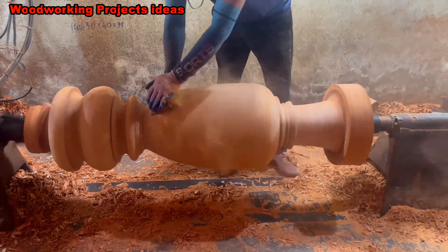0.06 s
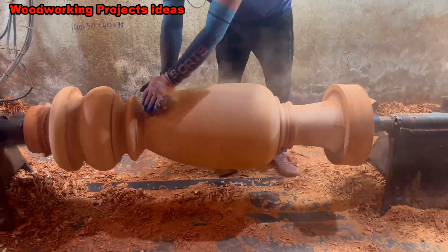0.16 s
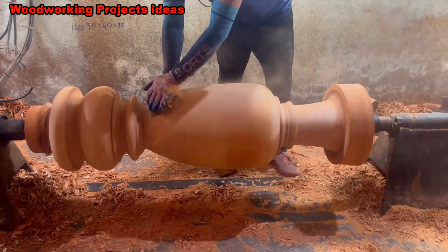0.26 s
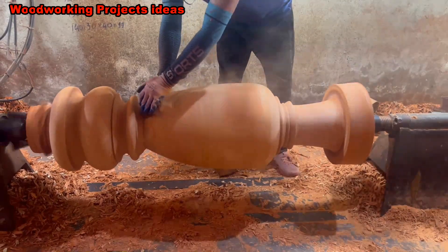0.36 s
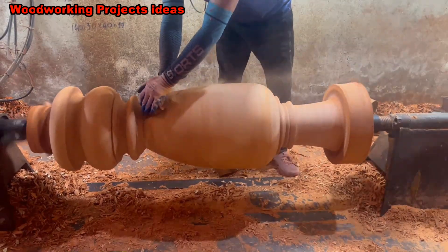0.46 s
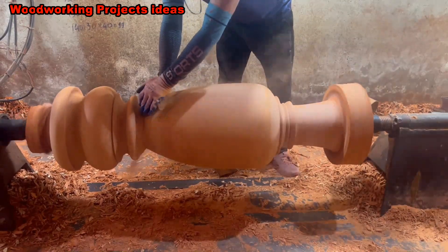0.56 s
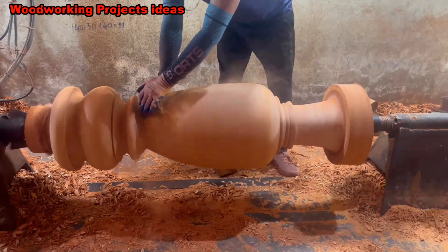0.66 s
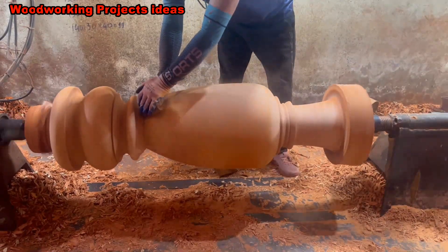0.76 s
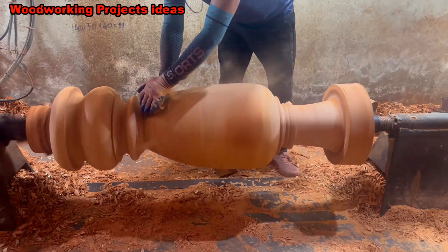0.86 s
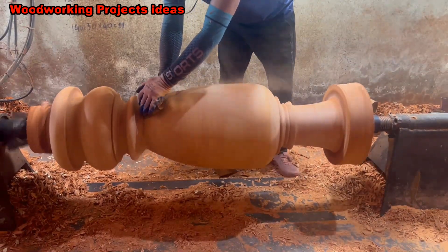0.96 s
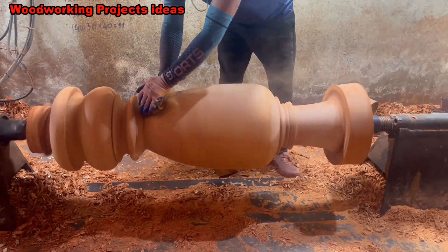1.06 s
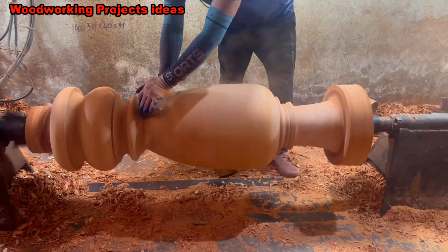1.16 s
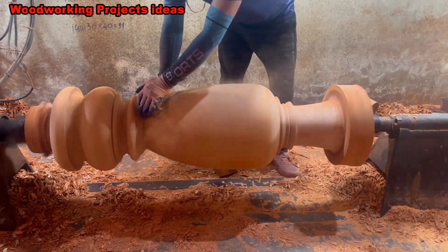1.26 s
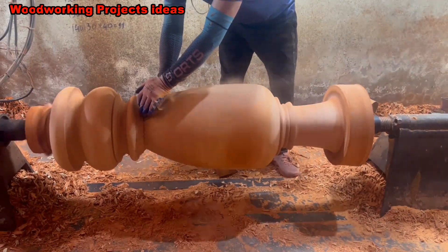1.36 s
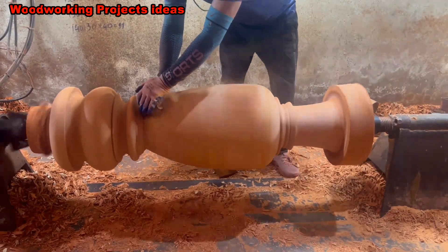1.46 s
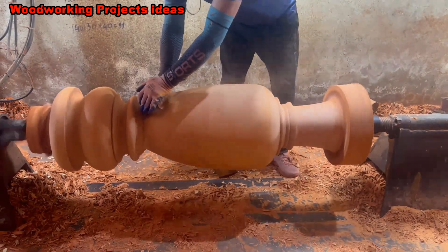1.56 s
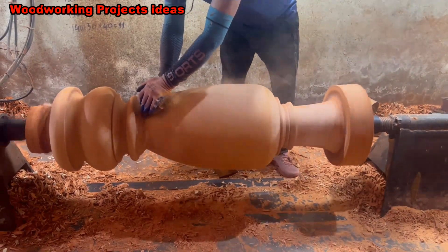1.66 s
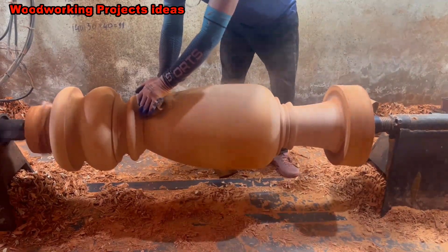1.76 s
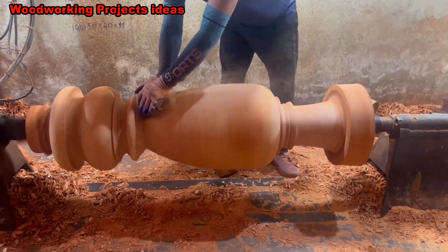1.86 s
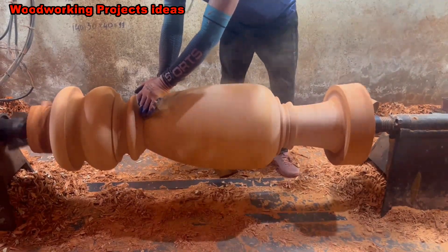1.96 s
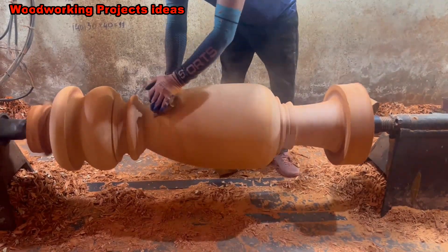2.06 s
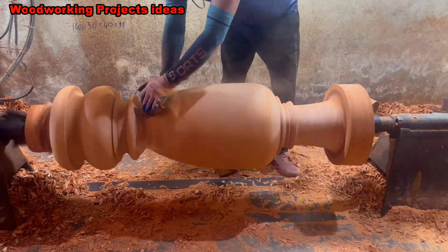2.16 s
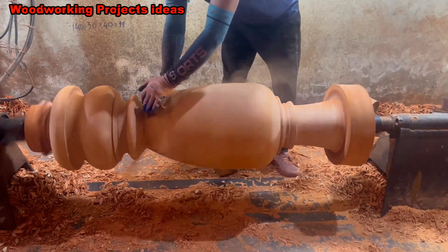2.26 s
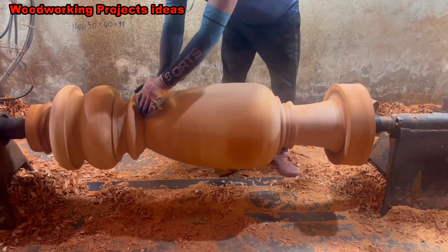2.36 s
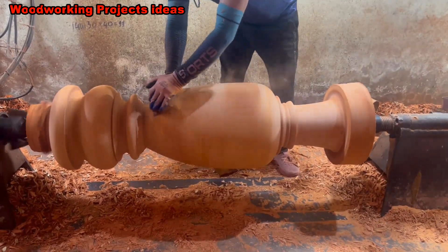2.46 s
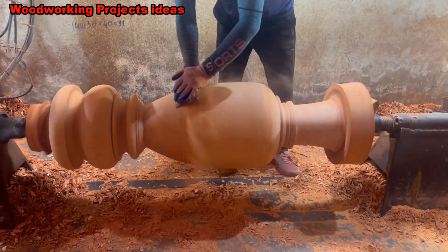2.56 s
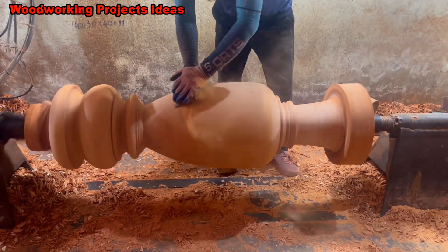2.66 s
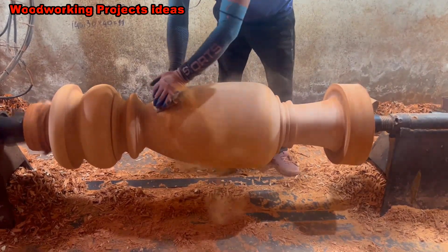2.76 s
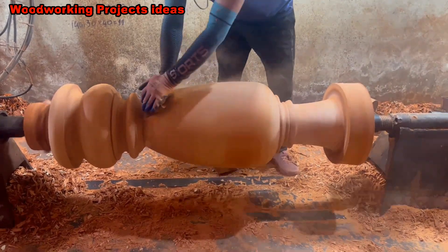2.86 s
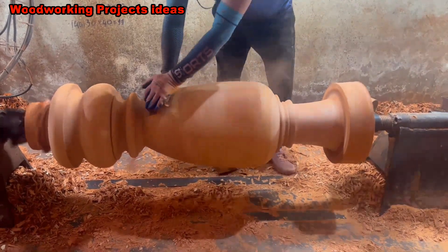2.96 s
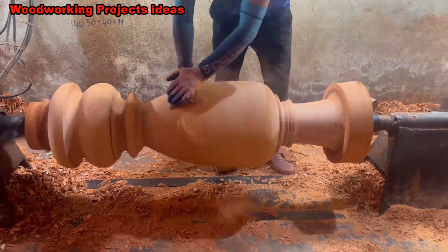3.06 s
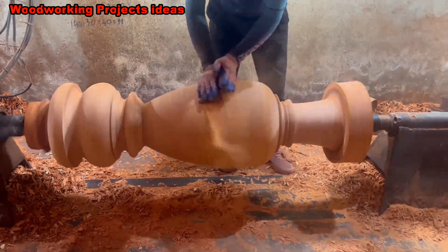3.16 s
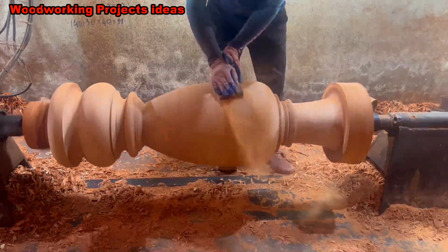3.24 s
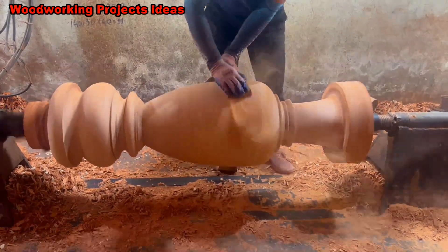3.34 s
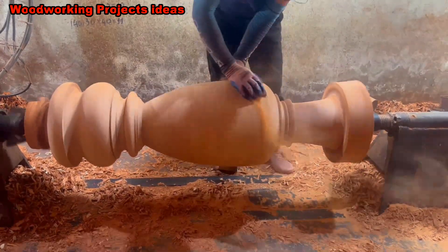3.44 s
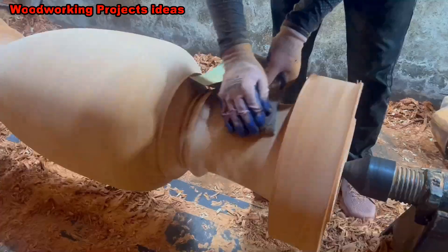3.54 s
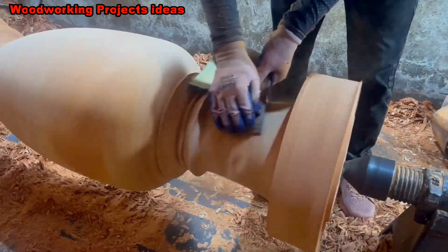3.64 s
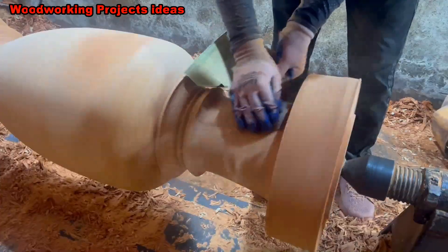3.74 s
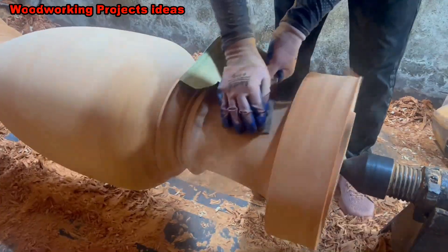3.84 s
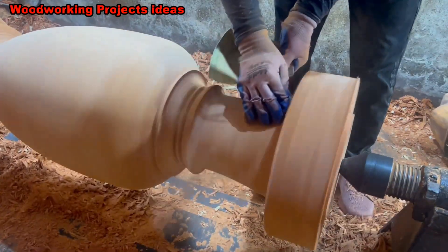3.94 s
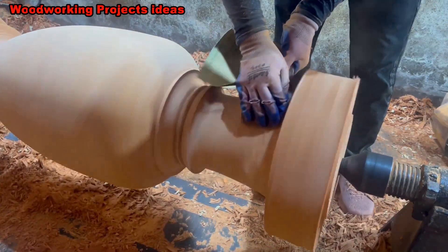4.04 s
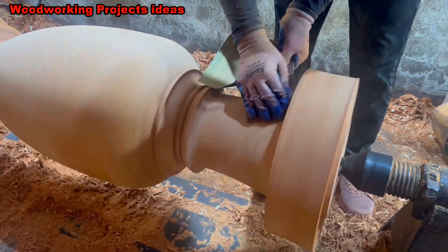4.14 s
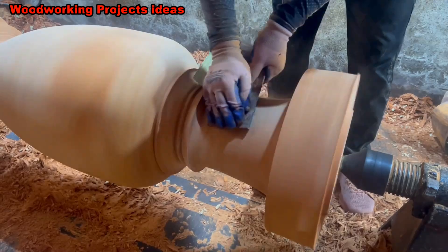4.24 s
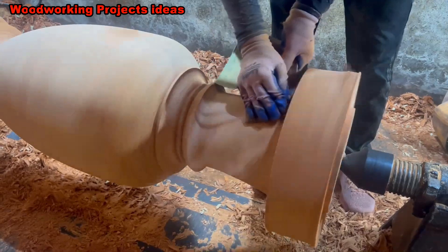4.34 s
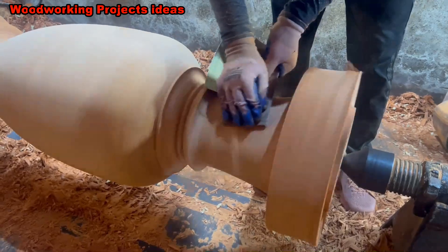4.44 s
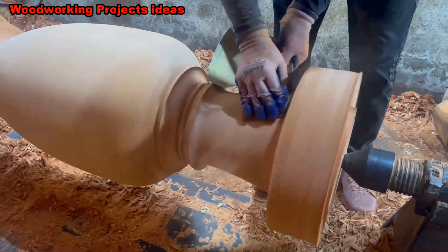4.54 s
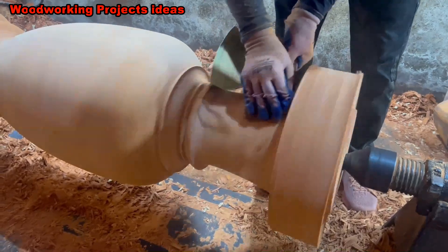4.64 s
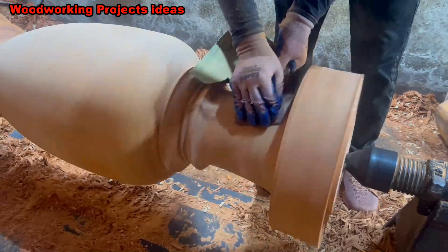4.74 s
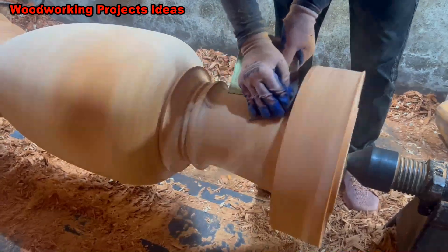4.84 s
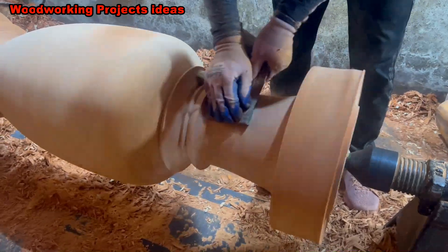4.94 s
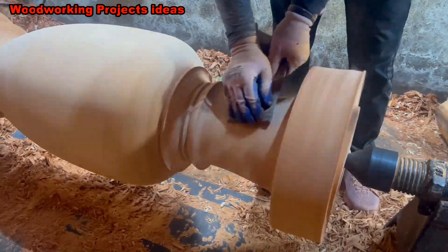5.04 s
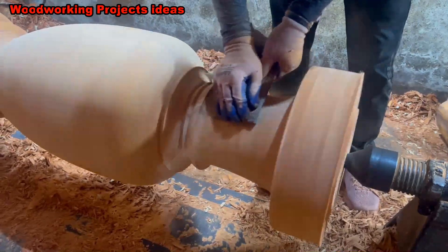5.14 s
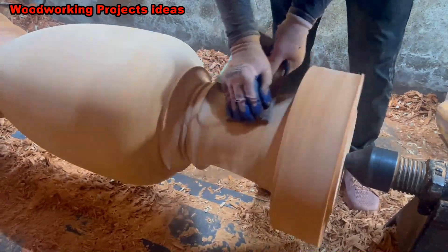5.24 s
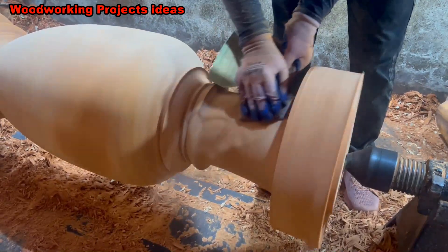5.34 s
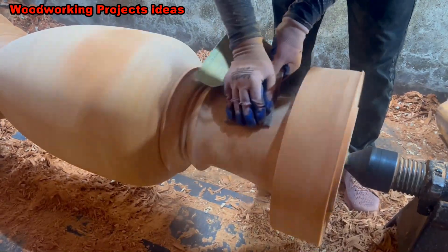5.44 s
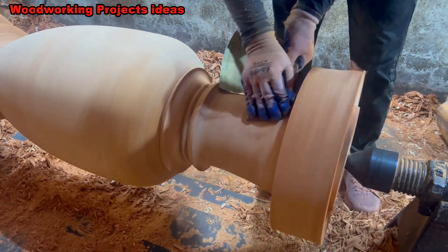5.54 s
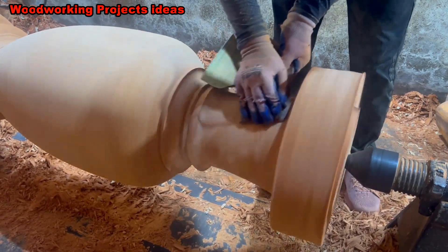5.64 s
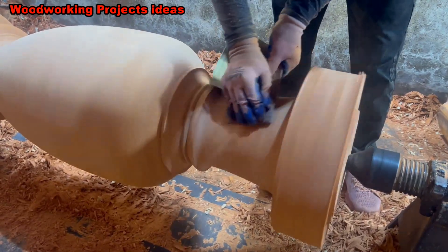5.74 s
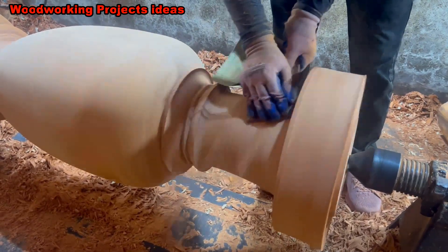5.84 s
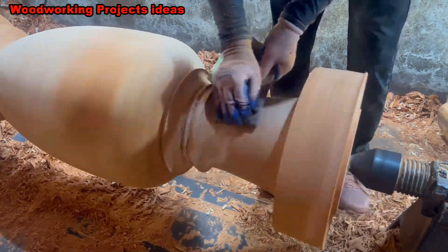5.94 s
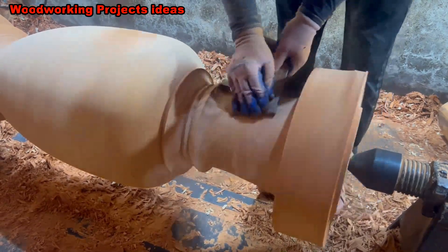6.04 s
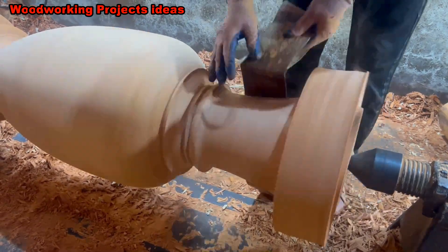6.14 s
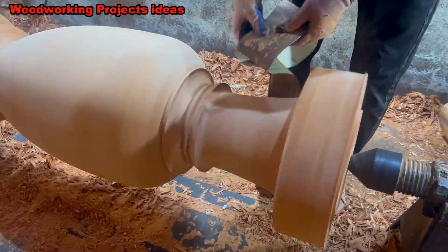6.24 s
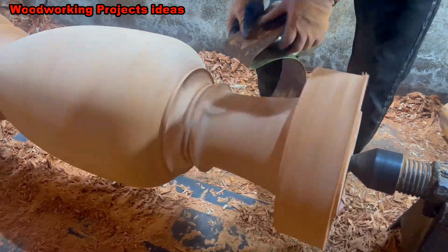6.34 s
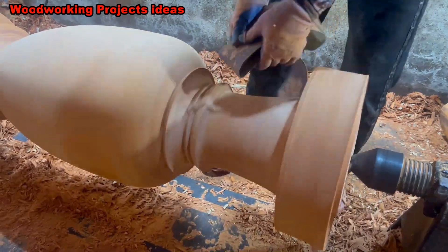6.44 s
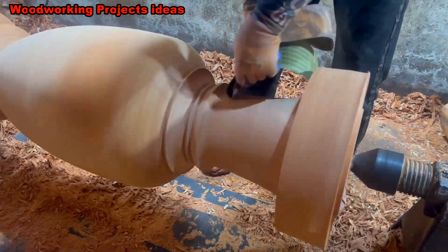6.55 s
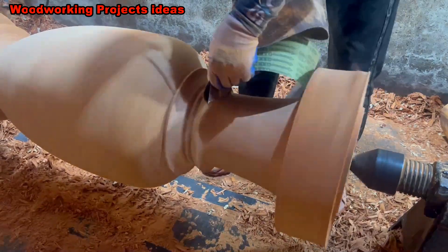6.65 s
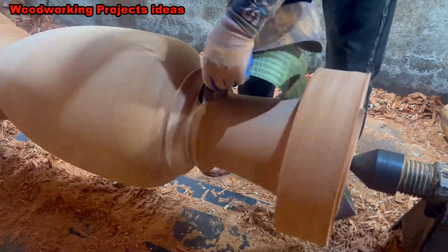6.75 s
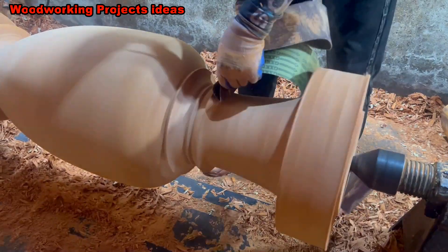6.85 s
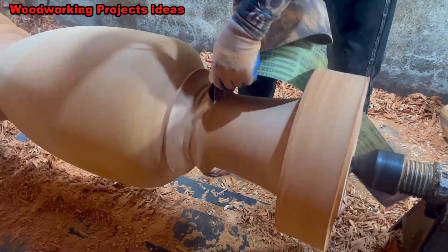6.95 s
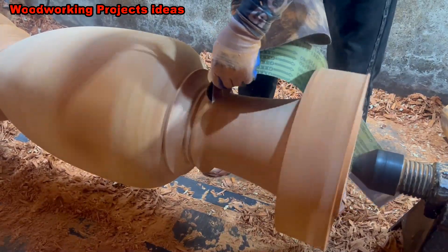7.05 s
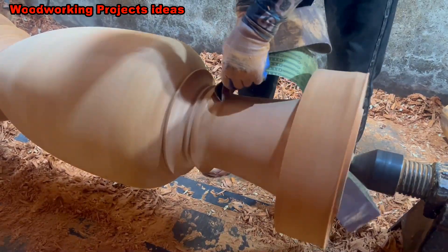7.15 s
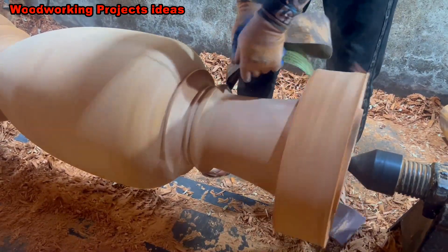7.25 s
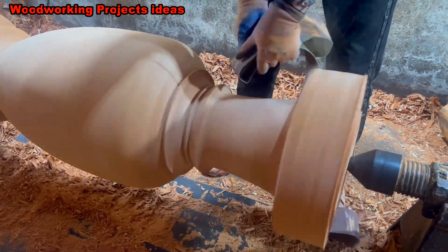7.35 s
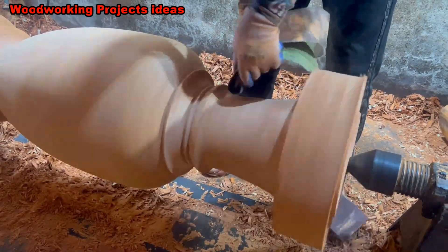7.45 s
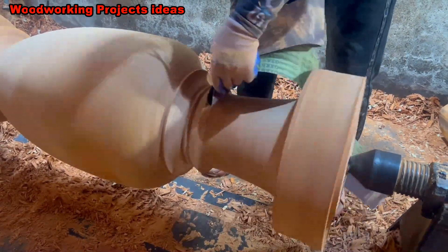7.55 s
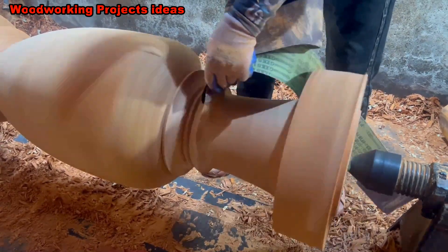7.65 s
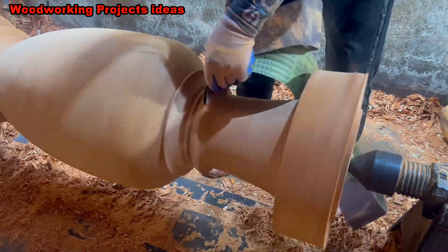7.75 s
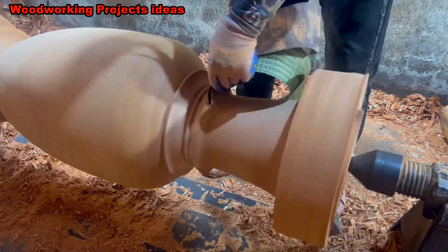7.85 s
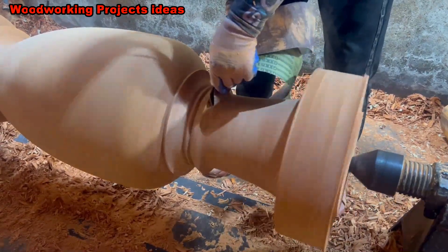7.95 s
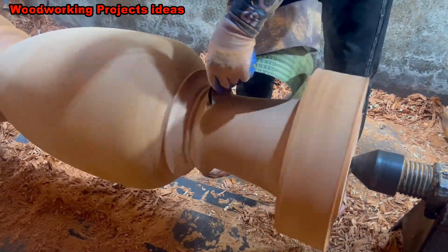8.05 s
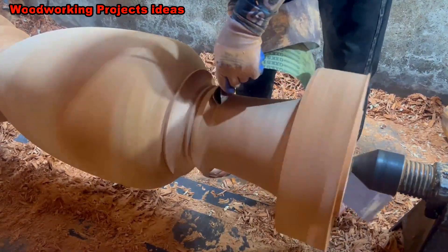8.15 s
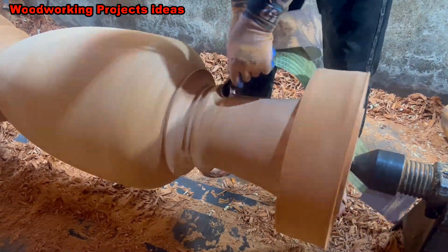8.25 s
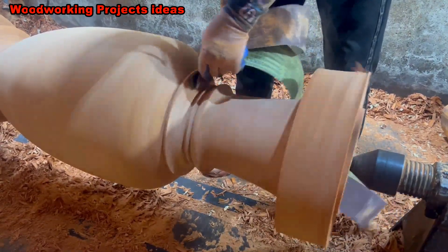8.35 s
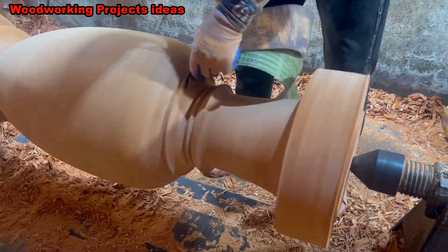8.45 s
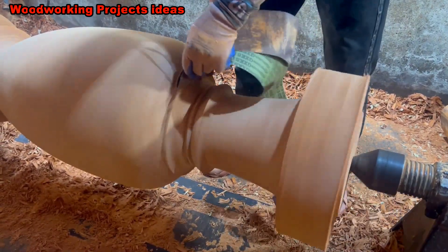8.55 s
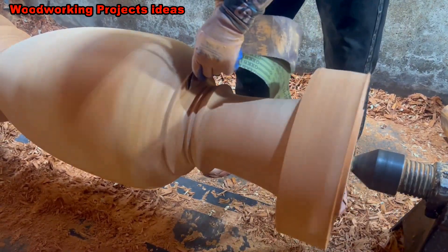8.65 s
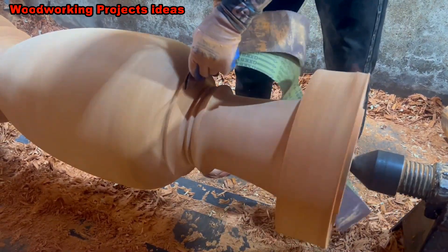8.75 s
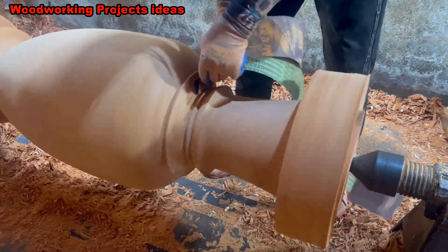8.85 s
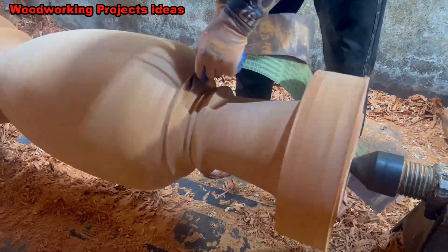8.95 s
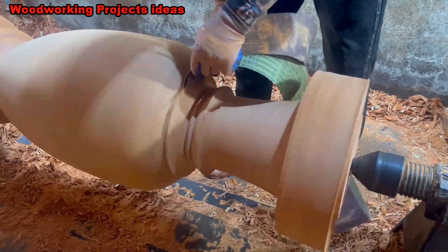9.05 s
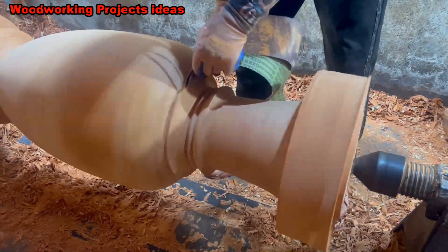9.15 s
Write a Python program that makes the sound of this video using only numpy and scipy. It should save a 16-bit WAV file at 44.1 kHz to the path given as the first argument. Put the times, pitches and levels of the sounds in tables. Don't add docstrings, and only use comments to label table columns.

```python
import sys
import numpy as np
from scipy import signal
from scipy.fft import rfft, irfft, next_fast_len
from scipy.io import wavfile
from scipy.ndimage import uniform_filter1d

SR = 44100
rng = np.random.default_rng(int(sys.argv[2]) if len(sys.argv) > 2 else 0)


def level_to_linear(level):
    exponent = np.asarray(level, float) / 20
    return 10 ** exponent


def master_out(mix):
    frames = np.transpose(np.atleast_2d(mix))
    ceiling = np.clip(frames, -1, 1)
    pcm = np.round(ceiling * 32767).astype(np.int16)
    wavfile.write(sys.argv[1], SR, pcm)


N = 405719
T = np.arange(N) / SR
STEP = 32
SLOW = np.arange(0, N + STEP, STEP) / SR
HZ = np.fft.rfftfreq(next_fast_len(N), 1 / SR) + 1e-3

# (start [s], end [s])
SCENE_CHANGE_S = (3.873, 3.899)
GRIP_START_S = [
    0,
    .17,
    2.85,
    3.885,
    6.7,
    7.75,
    8.7,
]
# (frequency [Hz], level per Hz [dB])
PAD_SWEEP_COLOUR = [(590, -54), (1000, -30), (1380, -15), (1550, -18), (2060, -12.5), (2970, -8.5),
                    (3490, -4), (4100, -2.5), (5850, -9), (8740, -6.5), (10300, -9.5), (12200, -23),
                    (15500, -31)]
PAD_FAR_COLOUR = [(590, -42), (1000, -17.5), (1390, -13.5), (1690, -14.5), (2620, -9.5), (3180, -6.5),
                  (3490, -4), (4150, -2.5), (4490, -2.5), (6560, -5), (8540, 0.5), (11800, -15.5),
                  (14100, -28), (15500, -30.5)]
PAD_NEAR_COLOUR = [(590, -38.5), (1000, -10), (1240, -9), (1490, -3.5), (1680, -4.5), (1920, -1.5),
                   (2740, -3), (3610, 0), (4440, -1.5), (5920, -2), (6950, -4.5), (9150, 0), (11000, -8.5),
                   (13200, -36), (15500, -36)]
STRIP_COLOUR = [(590, -49), (1000, -15), (1430, -9.5), (1560, -7.5), (2420, -12.5), (2740, -7.5),
                (3370, -5), (3830, -1), (4920, -2.5), (6870, -2.5), (7610, 2), (8540, -1.5), (10000, 3),
                (12500, -14), (15500, -23)]
STRIP_AGAIN_COLOUR = [(590, -40.5), (1000, -13), (1430, -13), (1620, -8), (2340, -9), (2940, -10),
                      (3610, -6.5), (4390, -6.5), (5340, -2.5), (6050, -4), (7440, 0), (8440, -3.5),
                      (9800, 2), (12500, -14), (15500, -23)]
GROOVE_COLOUR = [(590, -39), (1000, -11), (1300, -12), (1580, -9.5), (1820, -13), (2040, -9.5), (3180, -7),
                 (4700, -7.5), (7440, 0), (8640, -5), (9910, -3), (12500, -11.5), (13500, -25),
                 (15500, -26)]
# (frequency [Hz], level difference [dB])
FAR_LEAN = [(900, 3), (1500, -0.5), (4200, -1), (5000, 6), (6800, 4.5), (8300, 0.5), (10000, -2.5),
            (11800, -3), (13000, -13.5)]
NEAR_LEAN = [(1000, 4), (2000, 2), (2500, 4.5), (3700, 0), (5000, 2.5), (7000, -1), (9000, -1.5),
             (11000, -2), (12000, -9.5), (13000, -31)]
STRIP_LEAN = [(1000, 9), (1700, 0), (2400, 2), (3800, -1), (5200, 2), (7500, 0.5), (9000, -2.5),
              (10300, -0.5), (12000, -2), (13500, -12.5)]
GROOVE_LEAN = [(1000, 4), (2500, -1), (5000, 2.5), (7000, 5), (8500, 1), (9800, -4), (11500, 3),
               (12500, -11), (13500, -15)]
# (frequency [Hz], width [Hz], level [dB])
RESONANCES = [(9000, 320, -0.5), (3670, 320, 1), (1890, 230, 1), (15170, 3800, 4)]
# (time [s], level [dB])
PRESSURE_LEVEL = [
    [(0, -37.5), (.07, -34), (.4, -31), (1.5, -32.5), (2.7, -31.5), (3.3, -32), (3.57, -35.5),
     (3.66, -38.5), (3.875, -32)],
    [(3.895, -26), (4.3, -27.5), (5.0, -30), (6.1, -30.5), (6.44, -32.5), (7.0, -33.5), (7.9, -35.5),
     (8.6, -34), (9.2, -31.5)],
]
# (fine grit [dB], wood body [dB], share of pressure the body feels [0-1])
BALANCE = [(-1.5, -7, 0.3), (.5, -9, 0.1), (-1, -9, 0), (-2.5, -4.5, 0.81), (3, -10, 0.6), (4, -9.5, 0.8),
           (1.5, -9, .5)]
# (time [s], length [s], rasp [dB], fine grit
# [dB])
PAPER_SLIDES = [(.04, 0.25, 1, -2), (.56, 0.12, 2, -0.5), (2.403, 0.1, 4, -1), (2.814, 0.24, 3.5, -1.5),
                (2.92, 0.17, -0.5, -1.5), (3.118, 0.18, -0.5, 1.5), (3.366, 0.24, 6, -0.5),
                (4.076, 0.088, 1.5, 0.5), (4.458, 0.067, 4, 2.5), (5.488, 0.14, 3.5, -0.5),
                (6.03, 0.091, 2, 1.5), (7.92, .1, 2, 4), (8.462, 0.23, 3.5, -1), (8.884, 0.11, 2, 0)]
# (time [s], half length [s], fine grit level [dB])
SLACKENINGS = [(1.66, 0.025, -1), (1.81, 0.024, -3.5), (8.03, 0.059, -6.5), (8.16, 0.052, -7.5),
               (8.37, 0.044, -10.5), (9.17, .04, -5.5)]
# (time [s], half length [s], level [dB])
WOOD_THUMPS = [(3.3, 0.074, -4), (3.9, 0.033, -0.5), (3.96, 0.052, 2.5), (4.15, 0.027, 3.5),
               (5.2, 0.023, 6), (5.31, 0.076, -1), (5.5, 0.046, -2), (5.9, .12, -0.5), (5.99, .05, -0.5),
               (6.08, 0.064, 2.5), (6.21, .04, 2), (6.38, .06, -2.5)]
# (time off [s], time back on [s], level [dB])
PAPER_LIFTS = [
    (6.446, 6.941, -40),
    (7.576, 7.858, -32),
    (8.591, 8.739, -15),
    (8.663, 8.721, -30),
]
# (time [s], half length [s], level [dB])
FINEST_DUST = [(3.1, 0.37, -4), (3.6, .2, 0.5), (3.98, 0.086, -12), (4.13, .04, 7), (4.28, 0.057, 7),
               (4.42, .08, 10), (4.62, 0.15, -8.5), (4.95, .15, 1), (5.3, 0.17, -1), (5.55, 0.056, -6),
               (5.95, .12, 2), (6.3, 0.19, -7), (7.25, 0.4, 1), (8.22, 0.089, 1), (8.5, .1, 3),
               (8.9, 0.18, -3)]
# (time [s], level [dB])
LATHE_LEVEL = [
    [(0, -54), (.4, -52), (3.35, -51.5), (3.6, -53.5), (3.87, -49.5)],
    [(3.9, -42.5), (4.43, -44), (4.95, -47.5), (6.14, -48), (7.2, -48.5), (7.5, -46), (8.11, -48),
     (8.64, -45), (9.2, -48)],
]
# (frequency [Hz], level per Hz [dB])
DRONE_FAR_COLOUR = [(60, -45), (200, -6.5), (400, -7), (480, -17.5), (560, -8.5), (680, -6), (800, -1.5),
                    (950, -4.5), (1100, -10), (1500, -12), (3000, -34), (9000, -60)]
DRONE_NEAR_COLOUR = [(120, -74), (330, -15), (430, -19), (590, -3), (670, -4.5), (760, -1.5), (860, -5),
                     (1150, -14.5), (2050, -13.5), (2800, -21), (5000, -28.5), (8400, -39), (10300, -46),
                     (12500, -50)]
# (time [s], level [dB])
BREEZE_LEVEL = [
    [(0, -57), (1.1, -55), (3.87, -59)],
    [(3.9, -46), (4.15, -49.5), (4.4, -53.5), (5.45, -52.5), (5.6, -68), (7.0, -66.5), (8.4, -63),
     (8.52, -55), (9.2, -54)],
]
# (time [s], half length [s], level [dB])
AIR_GUSTS = [(3.97, .06, 3), (4.06, .06, 8), (5.1, 0.022, 13.5), (5.4, .04, 2), (5.63, 0.045, 10),
             (5.82, 0.036, 8), (6.09, 0.045, 19), (6.43, 0.081, 16), (6.55, 0.093, 20), (6.69, 0.055, 5),
             (7.02, 0.18, 12.5), (7.32, .05, 10), (7.67, 0.043, -5), (7.77, 0.027, 19), (8.0, .06, 13),
             (8.48, 0.036, 11.5), (8.8, .05, 7)]
AIR_LULLS = [(5.0, .05, -8), (5.34, 0.05, -15), (5.74, .06, -22), (5.94, .08, -6), (6.19, 0.069, -16),
             (6.3, .1, -7), (6.79, 0.076, -11), (7.26, 0.039, -16), (7.43, .03, -20), (7.53, 0.092, -31),
             (7.87, 0.035, -6), (8.09, 0.088, -33), (8.21, 0.091, -11), (8.35, 0.072, -8.5)]
# (frequency [Hz], level per Hz [dB])
RUMBLE_COLOUR = [(8, -50), (15, -18), (30, -9), (60, -5.5), (140, 4.5), (190, -1), (260, -38), (500, -70)]
FLUTTER_COLOUR = [(60, -70), (130, -41), (190, -1), (300, 2.5), (420, -2), (520, -5), (1000, -71)]
# (time [s], peak level [dB], pitch [Hz])
AIR_PUFFS = [(3.924, -24, 170), (3.957, -20, 110), (3.959, -12.5, 386), (3.972, -19, 140),
             (3.985, -22, 133), (4.005, -22, 55), (4.012, -16, 151), (4.035, -17, 194), (4.066, -23, 76),
             (4.162, -22, 300), (5.1, -34, 132), (5.395, -21.5, 305), (6.42, -22, 330), (7.33, -20, 552),
             (7.77, -37, 117), (8.0, -27, 455), (8.49, -32, 152)]
# (frequency [Hz], level per Hz [dB])
HISS_COLOUR = [(3000, -17), (5600, -13), (7500, -4), (10300, -6), (11000, -18), (12700, -24), (14500, -13),
               (15600, -18)]
# (time [s], level [dB])
SQUEAL_LEVEL = [
    [(0, -58), (.4, -58), (1.7, -48), (1.95, -46), (2.7, -46.5), (2.9, -47), (3.7, -49), (6.4, -44),
     (6.5, -90)],
]
# (time [s], peak level [dB])
SQUEAL_BEADS = [(1.7851, -25), (1.8699, -28), (1.9218, -30), (1.9852, -30), (2.058, -29), (2.1079, -27),
                (2.1433, -29), (2.2336, -27), (2.3114, -32), (2.4062, -28), (2.4436, -27), (2.502, -32),
                (2.5549, -30), (2.6023, -21), (2.6572, -31), (2.7055, -28), (2.7659, -31), (2.8328, -27)]
# (time [s], peak level [dB], pitch [Hz])
GRIT_SNAGS = [(1.7894, -18, 8400), (1.8944, -22, 4200), (2.2344, -20, 4190), (4.1124, -18, 4200),
              (4.1524, -26, 3280), (4.4797, -16, 3980), (7.011, -14, 7200), (7.864, -14.5, 9300)]
# (time [s], peak level [dB], pitch [Hz])
NECK_RINGS = [(3.9128, -23, 2250), (3.9538, -17, 2405), (4.0645, -22, 2140), (4.1129, -19, 2440),
              (4.1493, -16, 2350), (4.279, -21, 2350), (4.3878, -21, 2270), (4.4816, -22, 2380),
              (4.513, -19, 1900), (4.5617, -25, 1940), (4.9016, -25, 2680), (4.9365, -28, 2660),
              (5.176, -21, 2000), (5.3626, -24, 1850), (5.5302, -24, 2820), (5.6589, -22, 2000),
              (5.7332, -25, 1980), (5.795, -23, 1890), (5.8335, -25, 2030), (5.9118, -23, 2040),
              (5.9467, -17.5, 2050), (6.0141, -21.5, 2120), (6.0665, -17.5, 1950), (6.2106, -23, 1753),
              (6.274, -23, 2000), (6.4127, -27, 1935)]
# (time [s], peak level [dB], pitch [Hz])
BEARING_KNOCKS = [(6.49, -35, 773), (6.58, -40, 766), (6.635, -38, 721), (6.681, -31, 738),
                  (6.749, -39, 775), (6.801, -37, 647), (6.828, -39, 781), (6.866, -34, 794),
                  (6.879, -35, 773)]
# (frequency [Hz], level [dB])
SILENCE_LIMIT = [(40, -21), (200, -18), (400, -13), (500, -6.5), (600, -9), (800, -16), (1100, -12),
                 (1600, -15), (2700, -11), (4500, -12.5), (6000, -20), (10800, -22), (11800, -7),
                 (13000, -3.5), (16000, -6)]


def rms_one(x):
    return x / np.sqrt(np.mean(np.mean(x, axis=0) ** 2) + 1e-20)


def in_time(spans):
    s, *columns = np.transpose(np.vstack(spans))
    return [np.interp(SLOW, np.sort(s), c) for c in columns]


def at_hz(points, hz=HZ):
    table_hz, table_db = np.transpose(points)
    return np.interp(np.log(hz), np.log(table_hz), table_db)


def gain_of(db, times=T):
    return np.array([np.interp(times, SLOW, level_to_linear(row)) for row in np.atleast_2d(db)])


def coloured_noise(white, gain):
    size = next_fast_len(N)
    return rms_one(irfft(rfft(white, size) * gain, size)[..., :N])


def drift(rate, channels=1):
    r = np.exp(-2 * np.pi * STEP * rate / SR)
    white = rng.standard_normal((channels, len(SLOW) + 2000))
    slow = signal.lfilter([1], [1, -2 * r, r * r], white)[:, 2000:]
    return slow / slow.std(axis=1, keepdims=True)


def peaks(rows):
    return sum(db * np.clip(1 - np.abs(SLOW - s) / half, 0, 1) for s, half, db in rows)


def hold(start, end, rise, fall):
    return np.clip(np.minimum((SLOW - start) / rise, (end - SLOW) / fall), 0, 1)


def bursts(events, cycles, width):
    out = np.zeros((2, N))
    for s, db, hz in events:
        start = round(s * SR)
        t = np.arange(min(round(8 * cycles / hz * SR), N - start)) / SR
        phase = 0.67 * rng.choice([-1, 1]) * np.array([[1], [-1]])
        wave = np.sin(2 * np.pi * hz * t + phase) + width * rng.standard_normal((2, len(t)))
        lean = level_to_linear(2.0 * rng.standard_normal((2, 1)))
        age = t * hz / cycles
        out[:, start:start + len(t)] += level_to_linear(db) * lean * wave * age * np.exp(1 - age)
    return out


def hand():
    mean_db = -32
    edge_s, lift_s, land_s = 0.036, 0.06, .022
    settle_db, settle_s = -6.5, 0.15
    pressure, = in_time(PRESSURE_LEVEL)
    grip = np.searchsorted(GRIP_START_S, SLOW, "right") - 1
    fine, body, felt = np.transpose(BALANCE)[:, grip]
    coarser, duller = sum(np.outer((rasp_db, fine_db), hold(s, s + length, edge_s, edge_s))
                          for s, length, rasp_db, fine_db in PAPER_SLIDES)
    slack = peaks(SLACKENINGS)
    lifted = sum(db * hold(off, on, lift_s, land_s) for off, on, db in PAPER_LIFTS)
    settling = sum(settle_db * hold(on - land_s, on + settle_s, land_s, settle_s)
                   for _, on, _ in PAPER_LIFTS[:2])
    rasp_db = pressure + coarser + 0.58 * slack + lifted + settling
    body_db = mean_db + body + felt * (pressure - mean_db)
    body_db = body_db + .1 * slack + peaks(WOOD_THUMPS) + 0.56 * lifted
    fine_db = pressure + fine + duller + slack + lifted + 0.3 * settling
    return rasp_db, body_db, fine_db


def rasp(grain_db, shared_db, patchy_db):
    uneven = np.minimum(rng.exponential(1, (2, N)), 6)
    grit = rng.standard_normal((2, N)) * level_to_linear(grain_db * uneven)
    middle_db, body_db, fine_db = hand()
    tremble = shared_db * (drift(18.0) + 0.64 * drift(46) + 1.1 * drift(140))
    centres = np.geomspace(800, 16000, 12)
    patches = patchy_db * drift(21, channels=2 * len(centres)).reshape(-1, 2, len(SLOW))
    zones = [(1200, 3000), (3000, 6300), (6300, 12500)]   # body, middle, fine [Hz]
    zone_log_hz = np.log([2300, 4300, 7500])
    cuts = [round(s * SR) for s in GRIP_START_S] + [N]
    out, dust_db = np.zeros((2, N)), peaks(FINEST_DUST)
    colours = (PAD_SWEEP_COLOUR, PAD_FAR_COLOUR, PAD_SWEEP_COLOUR, PAD_NEAR_COLOUR,
               STRIP_COLOUR, STRIP_AGAIN_COLOUR, GROOVE_COLOUR)
    leans = (FAR_LEAN, FAR_LEAN, FAR_LEAN, NEAR_LEAN, STRIP_LEAN, STRIP_LEAN, GROOVE_LEAN)
    for colour, lean, a, b in zip(colours, leans, cuts, cuts[1:]):
        size = next_fast_len(b - a)
        hz = np.fft.rfftfreq(size, 1 / SR) + 1e-3
        ringing = sum(db / (1 + (2 * (hz - centre_hz) / width) ** 2) for centre_hz, width, db in RESONANCES)
        tilt = at_hz(lean, hz) / 2 * np.array([[1], [-1]])
        tone = rfft(grit[:, a:b], size) * level_to_linear(at_hz(colour, hz) + ringing + tilt)
        power = 2 * np.abs(tone.mean(axis=0)) ** 2 / size / (b - a)
        own_db = [10 * np.log10(power[(hz >= low) & (hz < high)].sum()) for low, high in zones]
        for k, centre in enumerate(centres):
            weights = [np.interp(np.log(centre), zone_log_hz, row) for row in np.eye(len(zones))]
            level_db = sum(w * (db - own) for w, db, own in zip(weights, (body_db, middle_db, fine_db), own_db))
            level_db = level_db + dust_db * np.interp(centre, [10000, 14000], [0, 1])
            share = np.interp(np.log(hz), np.log(centres), np.arange(len(centres)) == k)
            band = irfft(tone * share, size)[:, :b - a]
            out[:, a:b] += band * gain_of(level_db + tremble + patches[k] - 0.22, T[a:b])
    return out


def flexing(x, depth_db):
    _, _, cells = signal.stft(x, SR, nperseg=1024)
    field = rng.standard_normal(cells.shape[1:]) + 0.76 * rng.standard_normal(cells.shape)
    for _ in range(2):
        field = uniform_filter1d(uniform_filter1d(field, size=7, axis=1), size=6, axis=2)
    gain = level_to_linear(depth_db * field / field.std() - 0.24)
    return signal.istft(cells * gain, SR, nperseg=1024)[1][:, :N]


def lathe():
    white = rng.standard_normal((2, N))
    far = coloured_noise(white, level_to_linear(at_hz(DRONE_FAR_COLOUR)))
    near = coloured_noise(white, level_to_linear(at_hz(DRONE_NEAR_COLOUR)))
    drone = np.where(T < SCENE_CHANGE_S[1], level_to_linear(3.0) * far, level_to_linear(2.5) * near)
    hump = signal.sosfilt(signal.butter(2, 1000, fs=SR, output="sos"), drone)
    lumps_db = np.minimum(3.94 * drift(23) + 2.5 * drift(45, channels=2), 6)
    return gain_of(in_time(LATHE_LEVEL)[0]) * (drone + (gain_of(lumps_db) - 1) * hump)


def wind():
    calm_db, flutter_far_db, flutter_near_db = -55, -52.5, -46.5
    breeze, gusts, lulls = in_time(BREEZE_LEVEL)[0], peaks(AIR_GUSTS), peaks(AIR_LULLS)
    flutter = np.where(SLOW < SCENE_CHANGE_S[1], flutter_far_db, flutter_near_db)
    flutter = flutter + 0.53 * (breeze - calm_db) + 0.41 * gusts + 0.26 * lulls
    return breeze + gusts + lulls, flutter


def air():
    rumble_db, flutter_db = wind()
    white = rng.standard_normal((2, N))
    white = white + 0.06 * white[::-1]
    low = coloured_noise(white, level_to_linear(at_hz(RUMBLE_COLOUR)))
    high = coloured_noise(white, level_to_linear(at_hz(FLUTTER_COLOUR)))
    lumps_db = 1.63 * drift(10.0, channels=2) + 1.0 * drift(22)
    gusts = gain_of(rumble_db + lumps_db + 1.5) * low + gain_of(flutter_db + lumps_db - 0.3) * high
    return gusts * level_to_linear([[-0.3], [0.3]]) + level_to_linear(-7.0) * bursts(AIR_PUFFS, cycles=0.75, width=.05)


def hiss():
    return level_to_linear(-59.5) * coloured_noise(rng.standard_normal((2, N)), level_to_linear(at_hz(HISS_COLOUR)))


def squeal():
    centre_hz, width_hz = 4240, 150
    rise_s, half_s, usual_db, lift_db = .008, 0.017, -32.5, 7.5
    line = 1 / (1 + (2 * (HZ - centre_hz) / width_hz) ** 2)
    tone = coloured_noise(rng.standard_normal((2, N)), line)
    beads = peaks([(s + rise_s, half_s, lift_db + db - usual_db) for s, db in SQUEAL_BEADS])
    return tone * gain_of(in_time(SQUEAL_LEVEL)[0] + beads + 2.5 * drift(22))


def snags():
    band = signal.butter(2, [3000, 10500], "band", fs=SR, output="sos")
    return level_to_linear(-6.5) * signal.sosfilt(band, bursts(GRIT_SNAGS, cycles=14, width=.45))


def neck_rings():
    return level_to_linear(-6.5) * bursts(NECK_RINGS, cycles=9.0, width=0.085)


def bearing_knocks():
    return level_to_linear(-2.5) * bursts(BEARING_KNOCKS, cycles=2.5, width=.02)


def scene():
    sanding = flexing(rasp(grain_db=1.9, shared_db=0.58, patchy_db=1.34), depth_db=1.25)
    out = sanding + lathe() + air() + hiss() + squeal() + snags() + neck_rings() + bearing_knocks()
    start, end = SCENE_CHANGE_S
    gap_db = np.interp(T, [start, start + 0.0055, 3.886, end - .003, end], [0, -19, -12.0, -10, 0.5])
    return out * level_to_linear(gap_db)


def silence_weak_bands(x, scatter_db):
    hz, _, cells = signal.stft(x, SR, "cosine", 2048)
    edges = np.unique(np.cumsum(np.clip(np.arange(140) ** 2 // 330, 4, 8)) - 4)
    edges = np.append(edges[edges < 520], np.arange(520, len(hz), 5))
    widths = np.diff(np.append(edges, len(hz)))
    power = np.add.reduceat(np.abs(cells) ** 2, edges, axis=1)
    mean = power[:, hz[edges] > 1200].sum(axis=1, keepdims=True) / len(hz)
    limit_db = at_hz(SILENCE_LIMIT, hz[edges] + 40)[:, None]
    limit_db = limit_db + scatter_db * rng.standard_normal(power.shape[1:])
    kept = power / widths[:, None] > mean * level_to_linear(2 * limit_db)
    return signal.istft(cells * np.repeat(kept, widths, axis=1), SR, "cosine", 2048)[1][:, :N]


def band_limit(x):
    return signal.sosfilt(signal.butter(12, 15750, fs=SR, output="sos"), x)


def record(dry):
    rounded = .9 * np.tanh(dry / .9)
    return band_limit(silence_weak_bands(rounded, scatter_db=3.5))


dry = scene()
out = record(dry)
master_out(out)
```